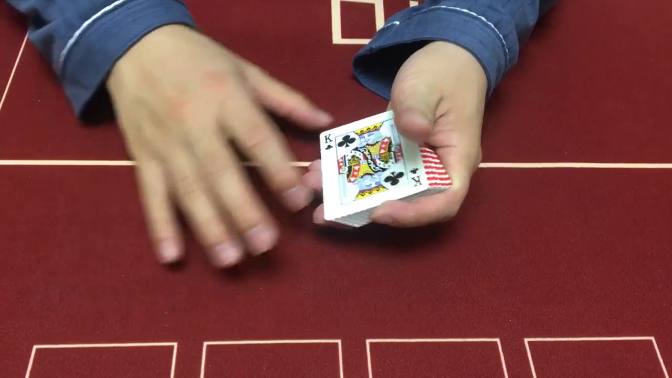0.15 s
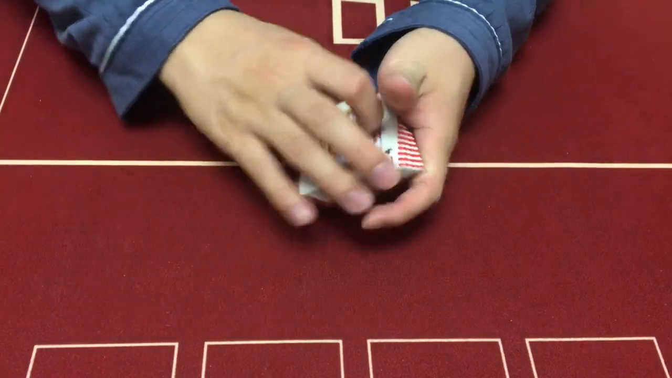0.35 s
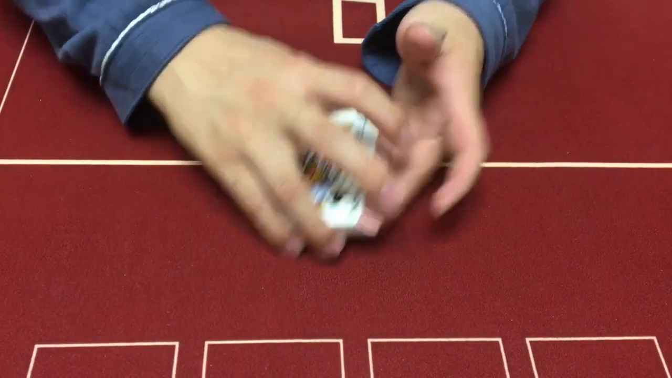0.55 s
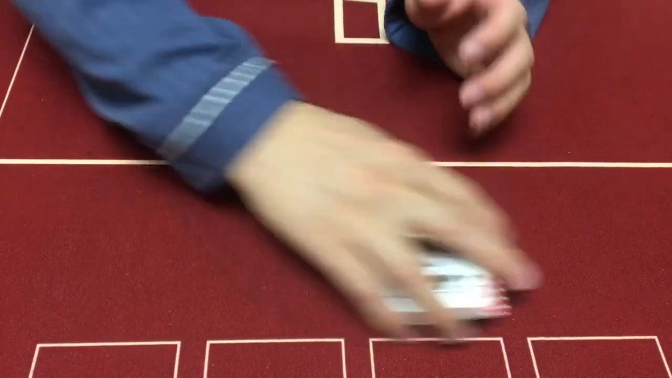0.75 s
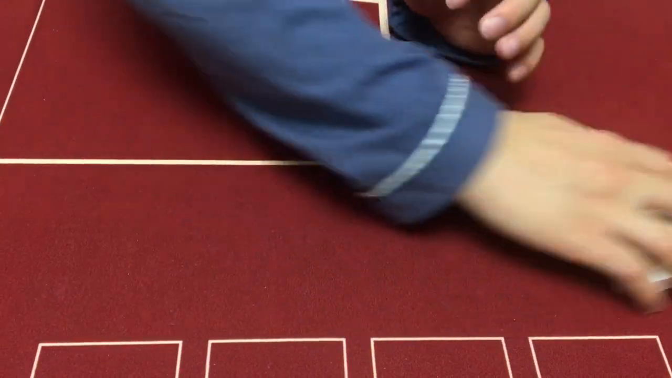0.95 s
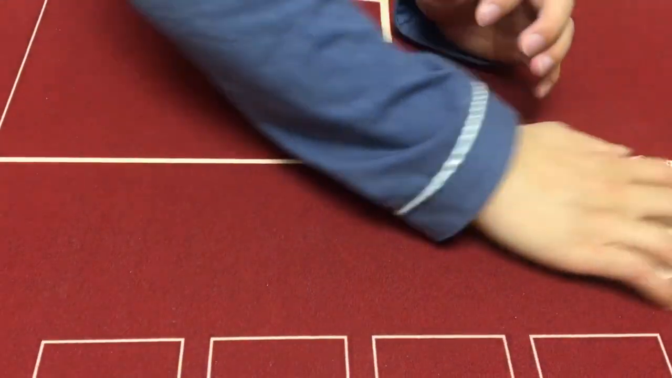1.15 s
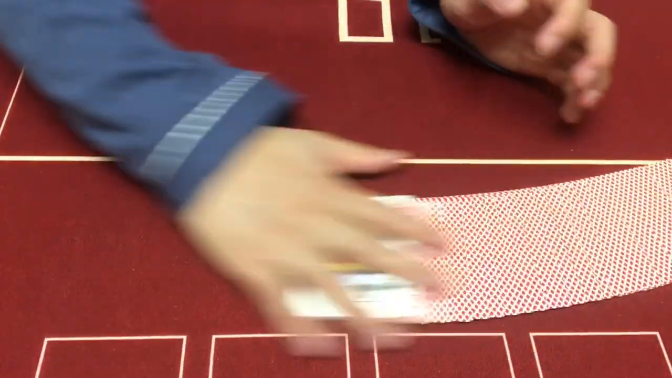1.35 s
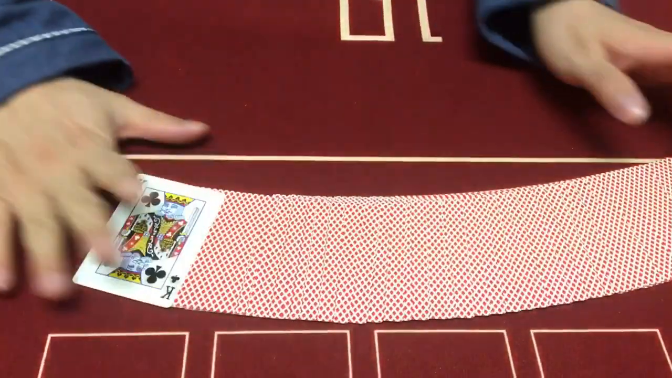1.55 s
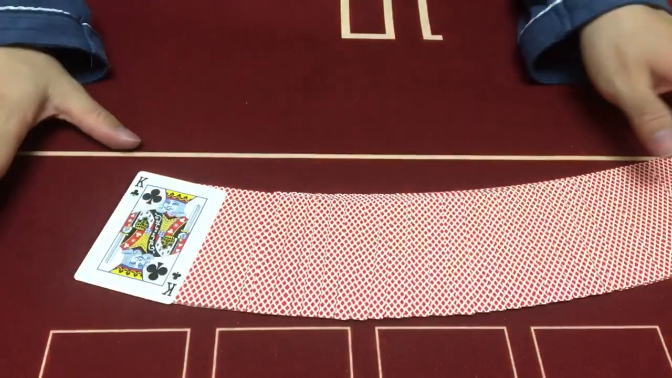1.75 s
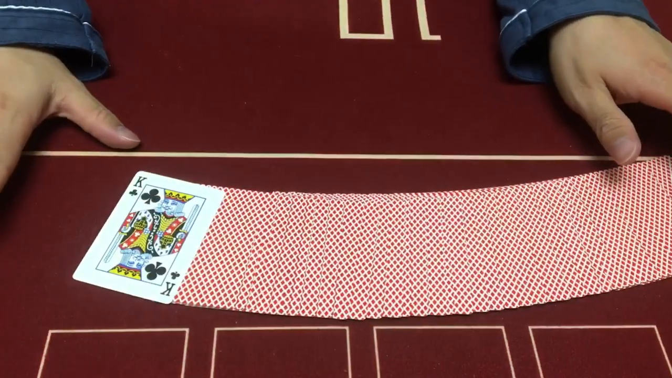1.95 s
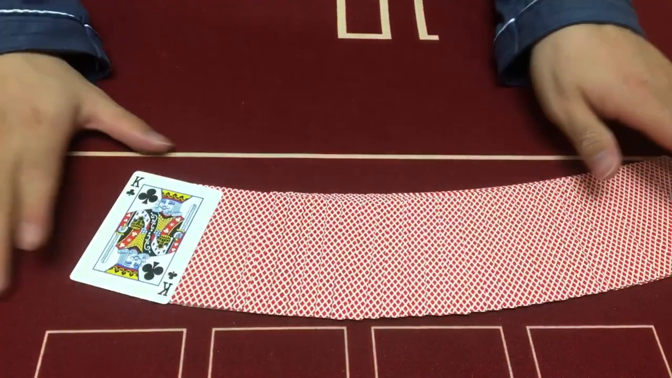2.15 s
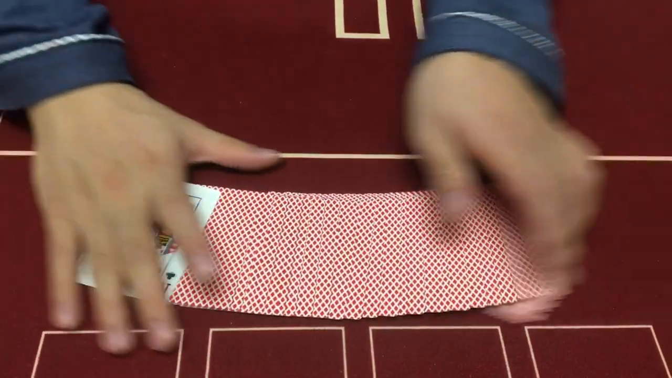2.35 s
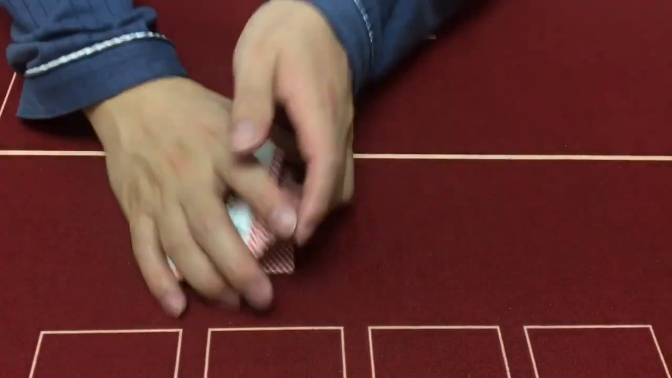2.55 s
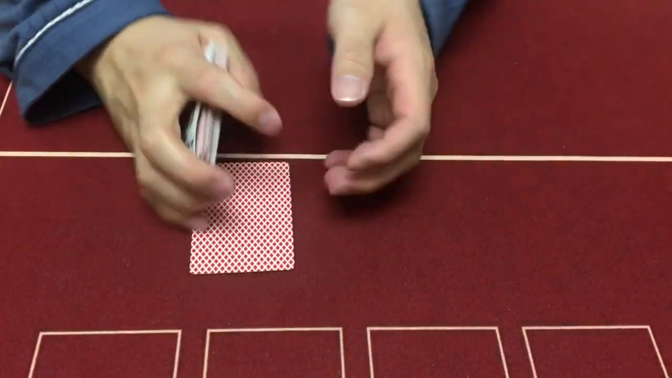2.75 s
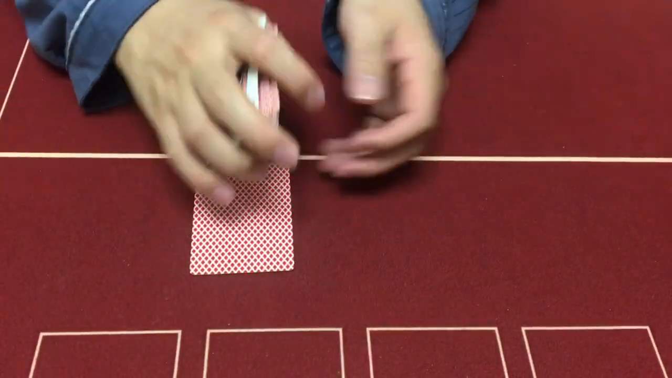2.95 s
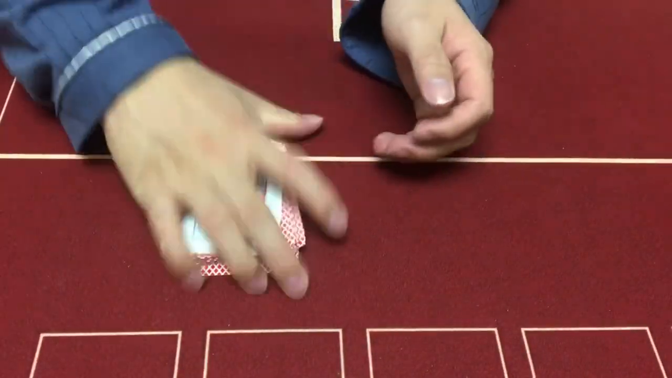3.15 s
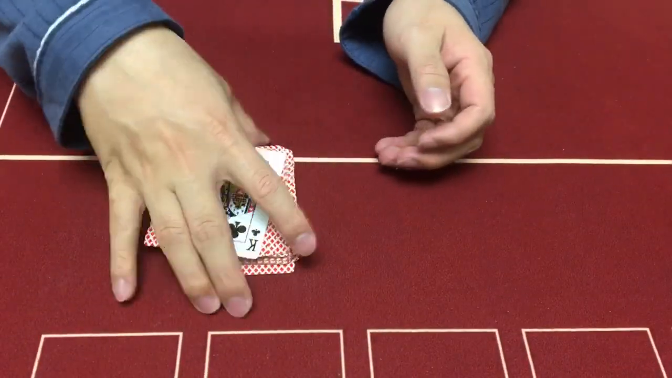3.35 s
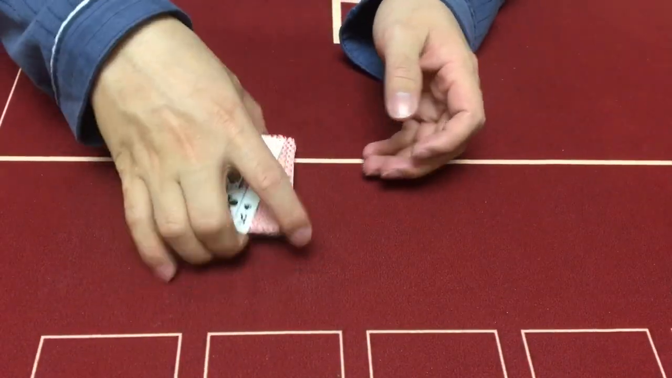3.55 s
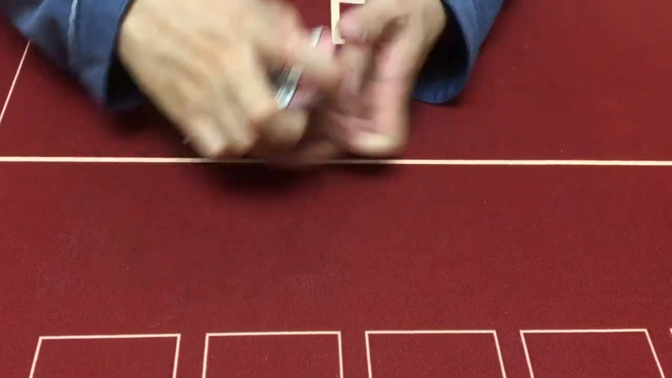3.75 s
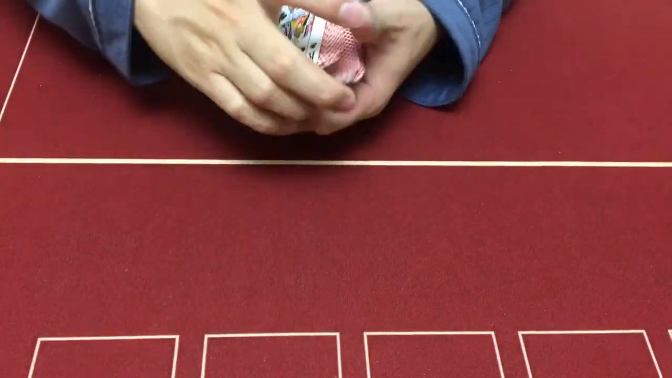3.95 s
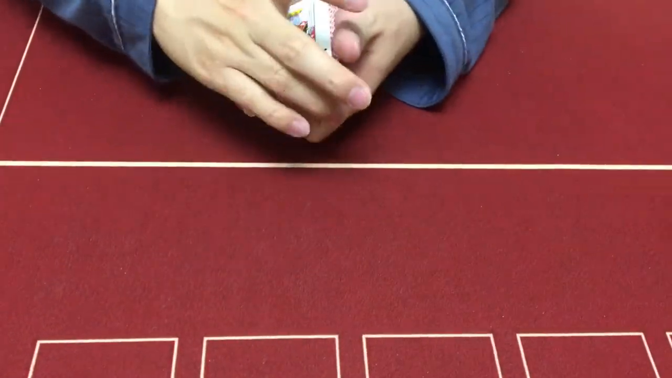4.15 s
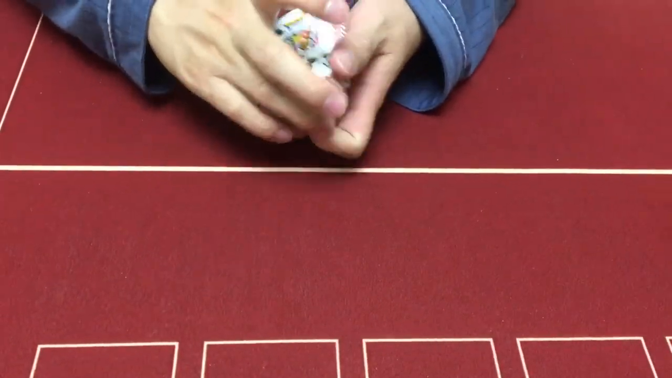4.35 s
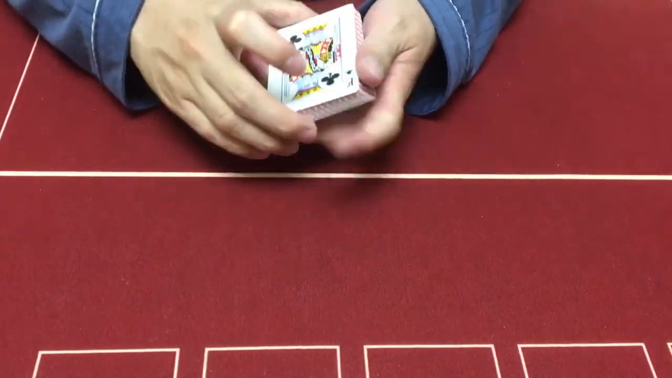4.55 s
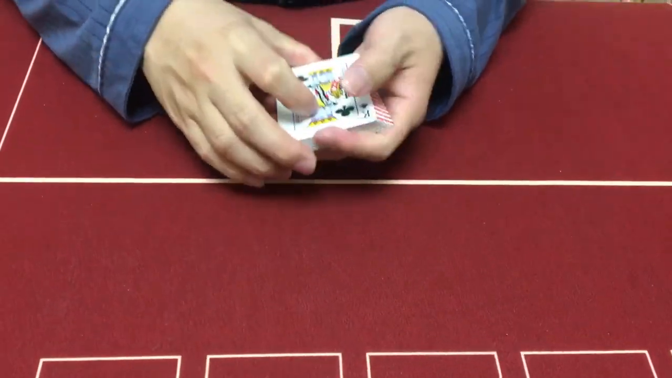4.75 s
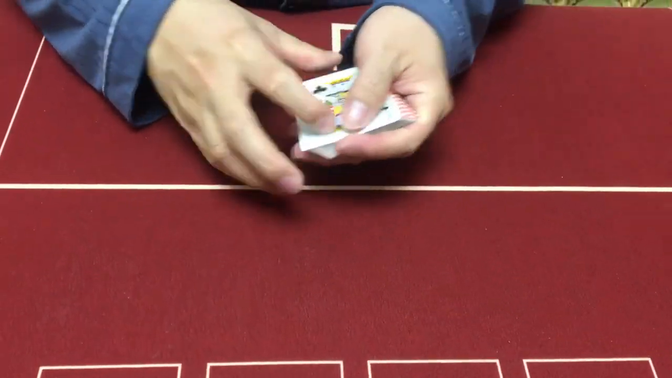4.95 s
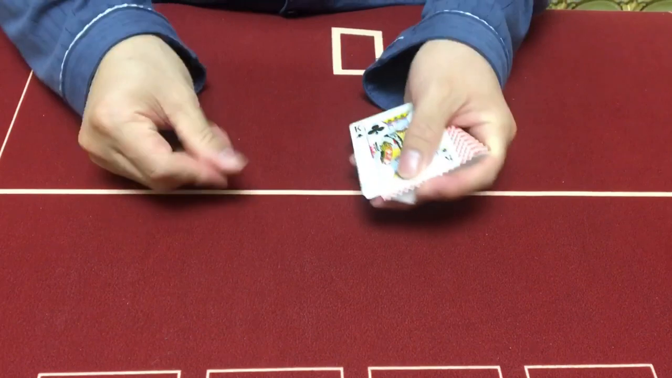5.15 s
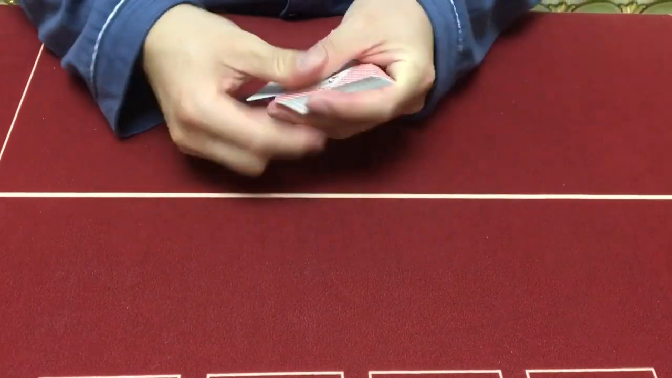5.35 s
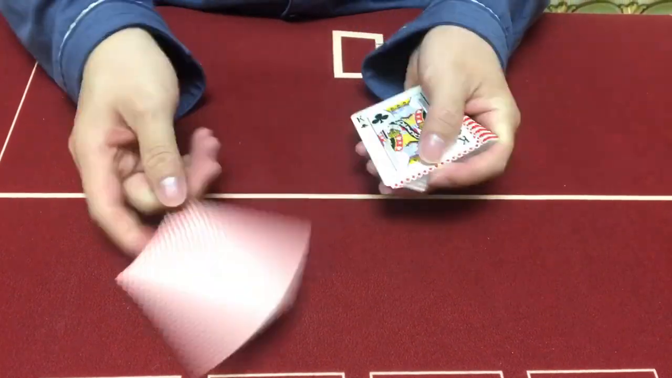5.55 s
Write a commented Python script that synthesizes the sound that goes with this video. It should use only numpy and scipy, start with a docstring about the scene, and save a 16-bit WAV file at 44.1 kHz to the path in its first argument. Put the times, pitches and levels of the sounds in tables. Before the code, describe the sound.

In a small room with steady ventilation hum and faint air hiss, a card deck is handled up close on a felt table. Fingertip ticks lead to a fast ribbon spread and a brushing scoop. A single woody knock lands midway, followed by sharp edge snaps, faint forearm rubbing, short slides, and a rising card swish.

```python
"""Playing cards on a felt table, close by, over steady low ventilation rumble and faint air hiss.
Shaped friction noise slides cards throughout; noise cracks are edges, short partials are fingertip taps.
A deck is spread into a ribbon of flicks, then scooped up; a faint hollow whirr (band noise) swells twice.
Force pulses through deck and table resonances knock the deck once; it is squared in the hands with ticks
and slides, forearms murmur, the whirr returns, and near the end the top card hisses off, brightening."""
import sys
import numpy as np
from scipy import signal
from scipy.fft import rfft, irfft, next_fast_len
from scipy.io import wavfile
from scipy.ndimage import uniform_filter1d, map_coordinates

SR = 44100
rng = np.random.default_rng(int(sys.argv[2]) if len(sys.argv) > 2 else 0)


def dump_mix(stems):
    """Bounce the given channels to the path in sys.argv[1] as a 16-bit WAV at rate SR."""
    frames = np.atleast_2d(stems).T  # one column per channel
    limited = np.clip(frames, -1, 1)  # hard clip at full scale
    pcm = np.round(limited * 32767).astype(np.int16)
    wavfile.write(sys.argv[1], SR, pcm)


N = 247401

# Ventilation rumble, air hiss: (frequency [Hz], relative level per Hz [dB])
RUMBLE_SPECTRUM = [(20, -52), (30, -18), (42, -7.5), (52, 3.5), (70, -2), (90, -4.5), (125, -10.5),
                   (200, -13.5), (280, -17.5), (400, -26), (600, -49.5), (1200, -79)]
AIR_SPECTRUM = [(150, -3), (350, -5.5), (550, -4.5), (850, -4.5), (1300, -7.5), (2000, -11), (2800, -10),
                (4000, -15.5), (6000, -20.5), (9000, -20.5), (15800, -23)]
# Hollow whirr: (peak time [s], rise [s], fall [s], peak rms level [dB], pitch [Hz])
WHIRRS = [(2.24, .36, 0.34, -69, 770), (2.92, 0.23, .15, -68.5, 810), (4.53, 0.29, .34, -66, 738)]
# Forearms shifting on the table: (time [s], rms level [dB])
LEAN = [(3.95, -82), (4.1, -60), (4.25, -61), (4.6, -65), (4.8, -75)]
# Reverberation: (frequency [Hz], t60 [s])
ROOM_T60 = [(100, 0.392), (300, 0.36), (800, 0.4), (2000, 0.448), (3200, 0.37), (6000, 0.42), (15000, 0.54)]
# Wall reflection: (frequency [Hz], relative level [dB])
WALLS = [(100, 4), (600, -3), (1500, -6.5), (2700, -5), (4500, -11), (9000, -9.5), (16000, -9)]
# Fingertips tapping cards: (time [s], relative level [dB], centre pitch [Hz])
TAPS = [(0.2738, -50, 1570), (0.3376, -52.5, 1940), (0.4199, -55.5, 2300), (0.4914, -55.5, 1580),
        (0.9877, -55, 2180), (1.0525, -52, 1700), (1.195, -50, 1360), (1.274, -49, 1200),
        (1.3219, -48, 1070), (2.385, -49.5, 1600), (2.405, -48, 1350), (3.4007, -52.5, 895),
        (3.873, -54, 1780), (4.575, -55, 1403), (4.8944, -59, 1195), (5.4455, -46, 1700)]
# Card edges snapping: (time [s], relative level [dB], deck nudge re crack [dB], ring pitch [Hz])
SNAPS = [(0.2732, -40, -25, 11000), (3.0615, -38, -9, 3210), (3.7544, -39.5, 4.5, 3420),
         (3.7625, -23, -13.5, 4500), (3.8718, -24, -28, 6800), (4.067, -37.5, -22, 3710),
         (4.3854, -46.5, -14, 8450), (4.6768, -36, -11.5, 5000), (4.8379, -42, -18, 3080),
         (5.3179, -39.5, -1.5, 4190), (5.5568, -44, -3, 3500)]
# Edge crack and rattle colour: (frequency [Hz], relative level per Hz [dB])
EDGE_SPECTRUM = [(300, -40.5), (1500, -5), (2600, -8.5), (4000, -1.5), (5500, -5.5), (7200, -1.5),
                 (10000, -6.5), (13500, -3), (16000, -13.5)]
# Deck spread into a ribbon: (start [s], end [s])
RIBBON_SPAN_S = (1.16, 1.4)
# Cards on felt, cards on cards: (frequency [Hz], relative level per Hz [dB])
FELT_SPECTRUM = [(200, -46.5), (600, -8), (1200, -4.5), (2300, -2.5), (2800, -2.5), (3600, 4), (4500, 0),
                 (6200, -2.5), (7500, -10.5), (10000, -12.5), (16000, -13.5)]
GLAZE_SPECTRUM = [(300, -34), (1000, -12), (2500, -7.5), (4500, -5), (6500, -2.5), (9000, 0.5), (12000, 3),
                  (14500, 4.5), (16000, 1)]
# Hand sweeps, spreading and scooping: (time [s], relative felt rub [dB], relative card hiss [dB])
SPREAD = [(1.02, -75, -98), (1.088, -60.5, -63.5), (1.318, -52, -46), (1.392, -55.5, -50),
          (1.424, -53, -47), (1.476, -60.5, -72), (1.7, -62, -72), (1.748, -72, -90), (1.78, -89, -95)]
SCOOP = [(1.93, -85, -95), (2.0, -65, -77), (2.138, -59.5, -63), (2.21, -59, -62), (2.452, -52.5, -55.5),
         (2.49, -74, -79)]
# Short slides: (time of greatest speed [s], length [s], relative rub [dB], relative hiss [dB])
SLIDES = [(0.01, .1, -72, -74.5), (0.295, .34, -71, -76), (0.475, 0.049, -66, -62.5),
          (0.527, .14, -66, -67), (0.79, .24, -62, -66), (0.946, 0.15, -66, -68), (1.503, 0.075, -69, -82),
          (2.565, 0.17, -59.5, -67.5), (2.675, 0.1, -69.5, -75), (2.771, 0.036, -66.5, -76),
          (2.841, 0.037, -70, -74.5), (2.92, .18, -76.5, -79), (3.016, 0.028, -62, -77),
          (3.077, 0.039, -59.5, -66), (3.376, 0.1, -65, -69), (3.447, .12, -65.5, -71),
          (3.55, 0.096, -66.5, -68), (3.659, 0.088, -62, -65.5), (3.835, 0.062, -63.5, -56),
          (3.907, .09, -66, -71), (4.02, 0.16, -70.5, -74), (4.3, 0.11, -76.5, -72),
          (4.417, 0.055, -78, -67), (4.581, .16, -77, -82), (4.898, .06, -69.5, -73),
          (5.038, 0.021, -73.5, -65), (5.128, 0.13, -68, -66.5), (5.23, 0.046, -64.5, -72.5),
          (5.466, 0.069, -67, -68), (5.6, 0.114, -63.5, -69.5)]
# Deck edge contacts, a few cards ahead of the bulk: (time [s], relative strength [dB], contact time [s])
LANDING = [(3.1053, -22.5, 0.000036), (3.106, -13.5, .0005), (3.109, -9.5, 0.00021), (3.11, -2.5, 0.000056),
           (3.1110, 4.5, 0.00034)]
# Deck and table-top resonances: (frequency [Hz], width [Hz], relative level [dB])
DECK_MODES = [(82, 16, -11), (213, 17, -2), (306, 25, -14), (387.5, 36, 0), (546, 50, -1.5), (712, 110, 3),
              (936, 170, -3.5), (1560, 310, 3), (2240, 380, -1), (2560, 350, -7), (3140, 290, -1.5),
              (4300, 210, -4), (5750, 240, -13.5), (7046, 1100, -24.5), (11440, 5800, -26.5)]
# Straggling single cards, brighter than the deck: (frequency [Hz], relative level [dB])
STRAGGLE = [(300, -30.5), (1200, -4), (3000, 1.5), (6000, -0.5), (16000, -1)]
# Microphone, narrow treble dip: (frequency [Hz], level [dB])
MICROPHONE = [(9000, -0.5), (9800, 0), (10400, -5), (11200, -1.5)]

TOP_HZ = 15900
SLIDE_RISE, SLIDE_FALL, SLIDE_SHAPE = 0.6, 0.4, 1.74  # shares of length; roundness exponent
DRAW_START_S, DRAW_LENGTH_S, DRAW_ATTACK_S, DRAW_RELEASE_S = 5.337, 0.093, 0.016, 0.026
DRAW_RUB_DB, DRAW_END_HISS_DB, DRAW_BRIGHTENS_DB_PER_S = -52, -42, 75


def amp(db):
    """Decibels to gain."""
    return 10 ** (np.asarray(db) / 20)


def unit(x):
    """Scale to rms 1."""
    return x / np.sqrt(np.mean(x ** 2) + 1e-20)


def along(points, hz):
    """Interpolate (Hz, value) points on a log axis."""
    f, v = np.transpose(points)
    return np.interp(np.log(hz + 1), np.log(f + 1), v)


def wobble(knots_per_s):
    """Smooth random curve."""
    knots = rng.standard_normal(int(N * knots_per_s / SR) + 4)
    return map_coordinates(knots, [np.arange(N) * knots_per_s / SR])


def filtered(x, response):
    """Multiply the spectrum of x by a function of frequency."""
    size = next_fast_len(N + SR // 2)
    return irfft(rfft(x, size) * response(np.fft.rfftfreq(size, 1 / SR)), size)[:N]


def coloured(x, spectrum):
    """Shape x by (Hz, dB) points."""
    return filtered(x, lambda hz: amp(along(spectrum, hz)))


def noise(spectrum):
    """Coloured noise of rms 1."""
    return unit(coloured(rng.standard_normal(N), spectrum))


def add(track, time_s, sound):
    """Mix a short sound in, cut at the track's end."""
    part = track[round(time_s * SR):][:len(sound)]
    part += sound[:len(part)]


def ventilation(rumble_db=-56.0, air_db=-68):
    """Steady noise: low rumble and faint air hiss."""
    return amp(rumble_db) * noise(RUMBLE_SPECTRUM) + amp(air_db) * noise(AIR_SPECTRUM)


def whirr(width_hz=150, fade_db=11):
    """Narrow noise bands swell and fade, fade_db down one rise or fall time from the peak."""
    t = np.arange(N) / SR
    out = np.zeros(N)
    for peak_s, rise_s, fall_s, db, pitch_hz in WHIRRS:
        band = filtered(rng.standard_normal(N), lambda hz: 1 / (1 + (2 * (hz - pitch_hz) / width_hz) ** 2))
        distance = (t - peak_s) / np.where(t < peak_s, rise_s, fall_s)
        out += unit(band) * amp(db - fade_db * distance ** 2)
    return out


def forearms():
    """Sleeves drag on the table: low noise murmurs faintly from its top."""
    s, db = np.transpose(LEAN)
    level = amp(np.interp(np.arange(N) / SR, s, db, left=-120, right=-120))
    return level * noise([(80, -31.0), (130, -11.5), (160, -2.5), (206, -2.5), (240, -13.5),
                          (400, -28.0), (1500, -56)])


def room(x, wet_db=-8, delay_s=0.009, build_s=0.0028):
    """Walls answer after a short gap with a noise tail whose decay time varies with frequency."""
    hz, t, z = signal.stft(rng.standard_normal((SR * 3) // 4), SR, nperseg=256)
    decay = amp(-60 * t / along(ROOM_T60, hz)[:, None])
    tail = signal.istft(z * decay, SR, nperseg=256)[1]
    tail *= 1 - np.exp(-np.arange(len(tail)) / SR / build_s)
    tail = np.pad(tail / np.linalg.norm(tail), (round(delay_s * SR), 0))
    return amp(wet_db) * coloured(signal.fftconvolve(x, tail)[:N], WALLS)


def nearby(x, early_db=-19, life_s=0.0086):
    """Hands and table rail scatter the sound within milliseconds: dense random echoes."""
    t = np.arange(SR // 30) / SR
    echoes = rng.standard_normal(len(t)) * t * np.exp(-2 * t / life_s)
    return amp(early_db) * signal.fftconvolve(x, echoes / np.linalg.norm(echoes))[:N]


def taps(ring_db=-6, tick_db=-7, ring_t60_s=0.028, tick_t60_s=0.009, detune=0.148, count=7):
    """A fingertip makes a held card ring briefly: scattered damped partials plus a noise tick."""
    t = np.arange(SR // 10) / SR
    damping = amp(-60 * t / ring_t60_s)
    out = np.zeros(N)
    for s, db, hz in TAPS:
        partials_hz = hz * np.exp(detune * rng.standard_normal((count, 1)))
        phases = rng.random((count, 1))  # cycles
        ring = np.sin(2 * np.pi * (partials_hz * t + phases)).sum(0) / np.sqrt(count)
        tick = rng.standard_normal(len(t)) * amp(tick_db - 60 * t / tick_t60_s)
        add(out, s, amp(db) * (amp(ring_db) * ring * damping + tick))
    return out


def snaps(crack_t60_s=0.0066, knock_t60_s=0.03, edge_db=-2, ring_db=3, knock_db=2):
    """A card edge slips off its neighbour with a dry crack and nudges the deck."""
    t = np.arange(SR // 20) / SR
    onset = 1 - np.exp(-t / 0.0004)
    cracks, knocks = np.zeros(N), np.zeros(N)
    for s, db, nudge_db, hz in SNAPS:
        crack, nudge = rng.standard_normal((2, len(t)))
        crack *= onset * amp(db + edge_db - 60 * t / crack_t60_s)
        ring = signal.lfilter(*signal.iirpeak(hz, 2, SR), crack)  # free length of card sets the pitch
        add(cracks, s, crack + amp(ring_db) * ring)
        add(knocks, s, amp(db + nudge_db + knock_db - 60 * t / knock_t60_s) * nudge)
    dull = [(100, 9.0), (500, -1.5), (1200, -6.5), (2500, -16.0), (8000, -43.5)]
    return coloured(cracks, EDGE_SPECTRUM) + coloured(knocks, dull)


def ribbon(level_db=-39, t60_s=0.0054, spread_db=2.0, count=52):
    """Cards peel off the moving deck one by one, fastest in mid sweep and loudest a little later."""
    t = np.arange(SR // 50) / SR
    start_s, end_s = RIBBON_SPAN_S
    out = np.zeros(N)
    for place, (slip, size) in zip(np.linspace(0, 1, count), rng.standard_normal((count, 2))):
        jittered = place + slip / count / 2
        phase = np.arccos(np.clip(1 - 2 * jittered, -1, 1)) / np.pi
        flick = rng.standard_normal(len(t)) * amp(level_db + spread_db * size - 60 * t / t60_s)
        add(out, start_s + phase * (end_s - start_s), np.sin(np.pi * phase) * phase * flick)
    return coloured(out, [(300, -28), (1000, -16), (2000, -22), (4000, 9.5), (8000, -1), (15000, -0.5)])


def patchy(x, depth_db):
    """The contact shifts as a card moves, so the colour of its rush keeps changing."""
    z = signal.stft(x, nperseg=512)[2]
    field = uniform_filter1d(rng.standard_normal(z.shape), size=7, axis=0)
    field = uniform_filter1d(field, size=7, axis=1)
    return signal.istft(z * amp(depth_db * unit(field)), nperseg=512)[1][:N]


def friction(spectrum, slips_per_s, grain_db, flutter_db):
    """Countless tiny slips: a smooth rush with single ones added, under uneven pressure; rms 1."""
    slips = rng.standard_normal(N) * (rng.random(N) < slips_per_s / SR)
    rush = patchy(rng.standard_normal(N) + amp(grain_db) * unit(slips), depth_db=2.0)
    return unit(coloured(rush, spectrum) * amp(flutter_db * wobble(110)))


def sweep(curve):
    """Rub and hiss gains along a long movement of the hand."""
    s, *levels = np.transpose(curve)
    return amp([np.interp(np.arange(N) / SR, s, db, left=-120, right=-120) for db in levels])


def sliding(rub_db=1.0, hiss_db=2, spread_trim_db=(-0.95, 1.4), scoop_trim_db=(0, 1.5), unsteady_db=0.64):
    """Cards drag dully over felt and fingers, hiss over each other; short slides stop faster than they start."""
    t = np.arange(N) / SR
    power = np.zeros((2, N))
    for s, length_s, slide_rub_db, slide_hiss_db in SLIDES:
        share = np.where(t < s, SLIDE_RISE, SLIDE_FALL)
        speed = np.exp(-np.abs((t - s) / length_s / share) ** SLIDE_SHAPE)
        power += (amp([[slide_rub_db], [slide_hiss_db]]) * speed) ** 2
    gains = np.sqrt(power) * amp(unsteady_db * wobble(25))
    gains += amp(spread_trim_db)[:, None] * sweep(SPREAD)
    gains += amp(scoop_trim_db)[:, None] * sweep(SCOOP)
    rub, hiss = gains
    felt = friction(FELT_SPECTRUM, slips_per_s=1000, grain_db=-10.5, flutter_db=0.75)
    glaze = friction(GLAZE_SPECTRUM, slips_per_s=2500, grain_db=-16.0, flutter_db=1.6)
    return amp(rub_db) * rub * felt + amp(hiss_db) * hiss * glaze


def stroke(start_s, length_s, attack_s, release_s):
    """A movement speeds up, holds until its length is over and comes to rest."""
    t = np.arange(N) / SR - start_s
    return np.clip(t / attack_s, 0, 1) * np.clip(1 - (t - length_s) / release_s, 0, 1)


def draw():
    """The top card scrapes out from under the thumb, hissing more as it gathers speed."""
    before_end_s = np.clip(np.arange(N) / SR - DRAW_START_S - DRAW_LENGTH_S, -DRAW_LENGTH_S, 0)
    thumb_spectrum = [(300, -20), (900, -5.5), (2000, 1), (2900, -7), (3900, 3.5), (7000, -9), (16000, -16)]
    thumb = friction(thumb_spectrum, slips_per_s=900, grain_db=-7, flutter_db=2.5)
    glaze = friction(GLAZE_SPECTRUM, slips_per_s=2500, grain_db=-18, flutter_db=1.2)
    motion = stroke(DRAW_START_S, DRAW_LENGTH_S, DRAW_ATTACK_S, DRAW_RELEASE_S)
    hiss = amp(DRAW_END_HISS_DB + DRAW_BRIGHTENS_DB_PER_S * before_end_s) * glaze
    return motion * (amp(DRAW_RUB_DB) * thumb + hiss)


def rattle(level_db=-28, t60_s=0.0042, rise_s=0.00046):
    """After each contact the loose cards chatter against each other: short noise bursts."""
    t = np.arange(SR // 10) / SR
    out = np.zeros(N)
    for s, db, _ in LANDING:
        decay = amp(level_db + db / 2 - 60 * t / t60_s)
        add(out, s, decay * (1 - np.exp(-t / rise_s)) * rng.standard_normal(len(t)))
    return coloured(out, EDGE_SPECTRUM)


def deck_body(hz):
    """Damped resonances of the deck and the table under it."""
    return sum(amp(db) * 1j * hz * w / (c * c - hz * hz + 1j * hz * w) for c, w, db in DECK_MODES)


def knock(level_db=19, scatter_db=-5, scatter_s=0.0012, room_db=1):
    """The deck's edge strikes the table in several quick contacts; longer contacts are duller."""
    t = np.arange(SR // 50) / SR
    out = np.zeros(N)
    for s, db, contact_s in LANDING:
        push = np.exp(-t / contact_s)
        force = np.zeros(N)
        add(force, s, amp(db + level_db) * push / push.sum())
        blow = filtered(force, deck_body)
        lags = rng.standard_normal(len(t)) * np.exp(-t / scatter_s)  # single cards arrive slightly late
        late = signal.fftconvolve(blow, lags / np.linalg.norm(lags))[:N]
        out += blow + amp(scatter_db) * coloured(late, STRAGGLE) + amp(room_db) * room(blow)
    return out


def scene():
    """Handling and the knock, with near scatter and room, over the background."""
    handling = sliding() + draw() + ribbon() + snaps() + amp(5.5) * taps()
    cards = handling + knock() + rattle()
    background = forearms() + whirr() + ventilation()
    return (cards + nearby(cards) + amp(-1.5) * room(handling) + background)[None]


def record(dry):
    """The microphone colours the treble; nothing passes from TOP_HZ up."""
    return filtered(coloured(dry[0], MICROPHONE), lambda hz: hz < TOP_HZ)[None]


dry = scene()
out = record(dry)
dump_mix(out)
```